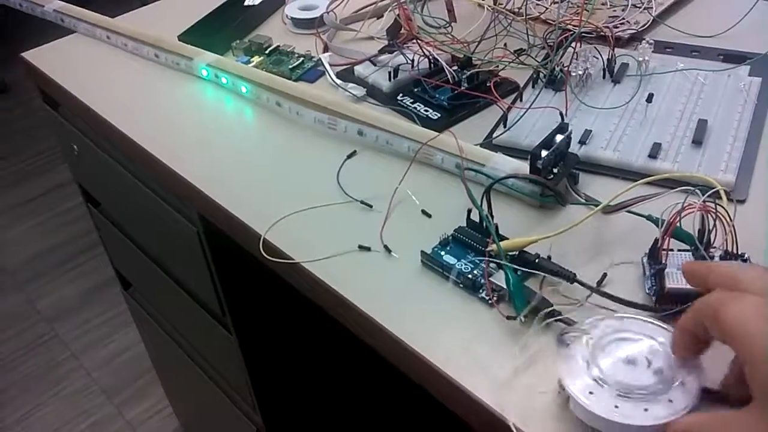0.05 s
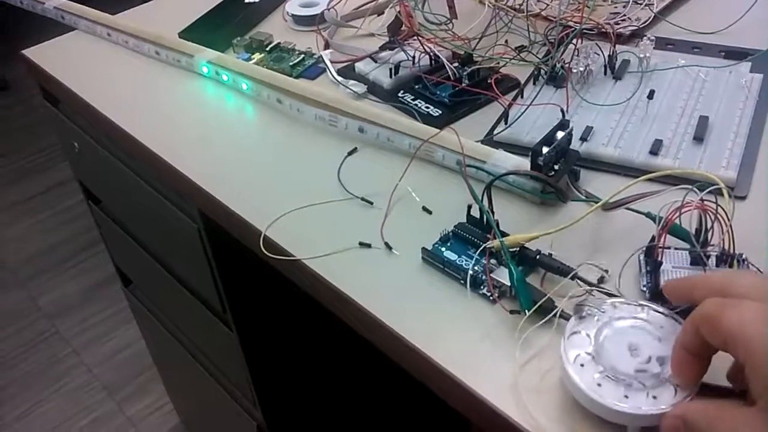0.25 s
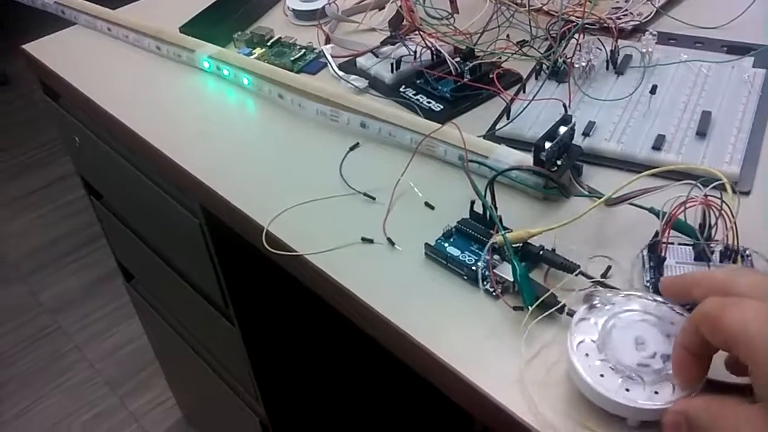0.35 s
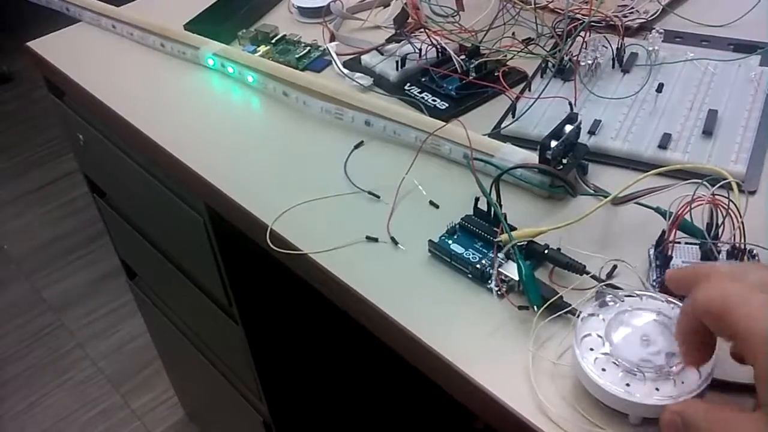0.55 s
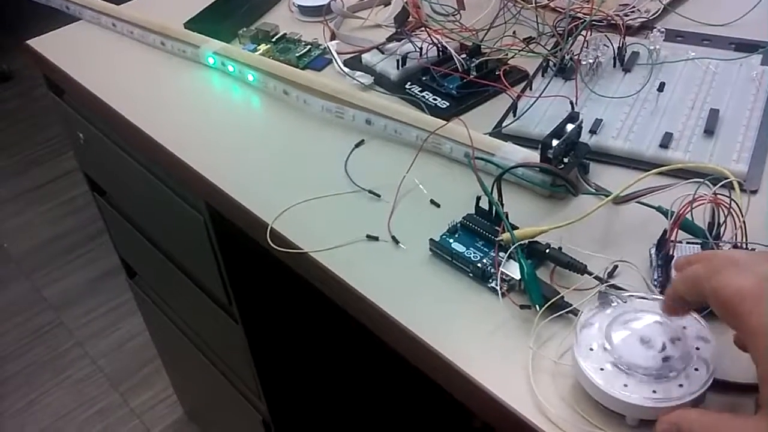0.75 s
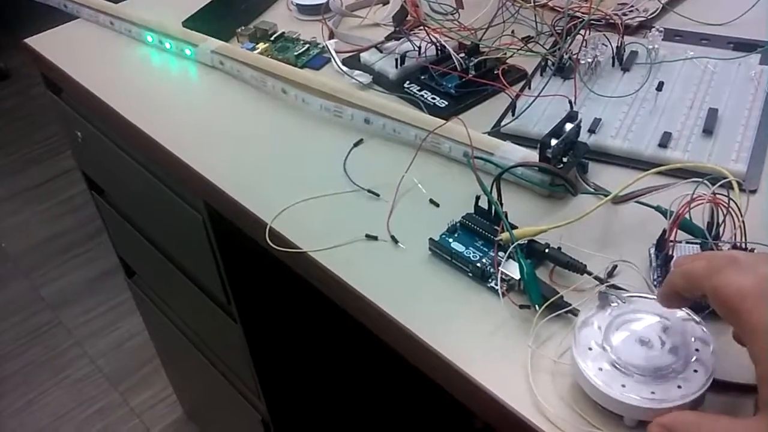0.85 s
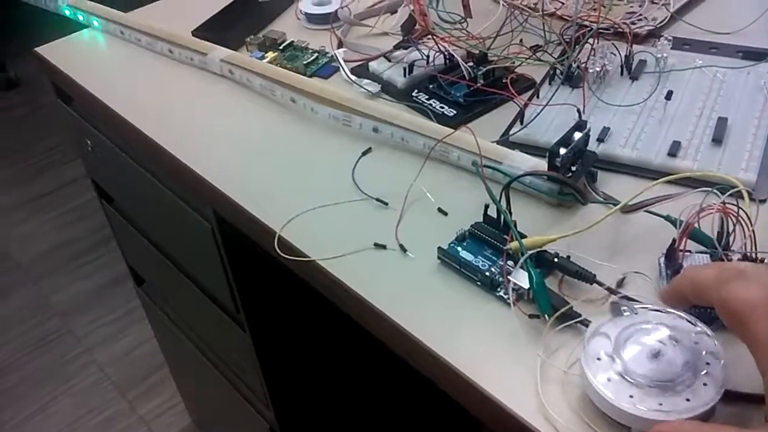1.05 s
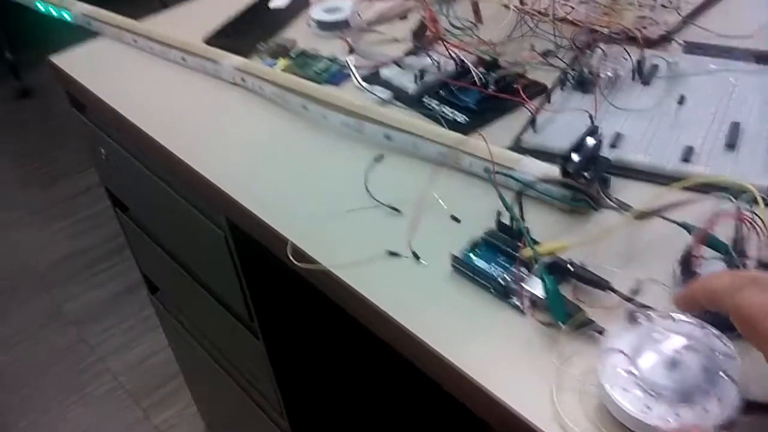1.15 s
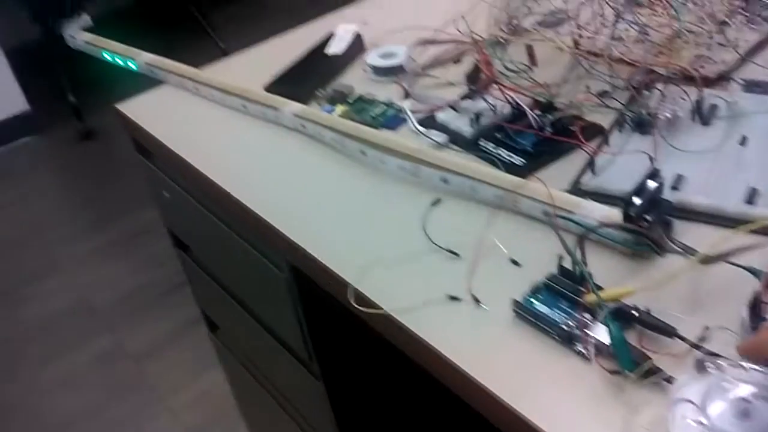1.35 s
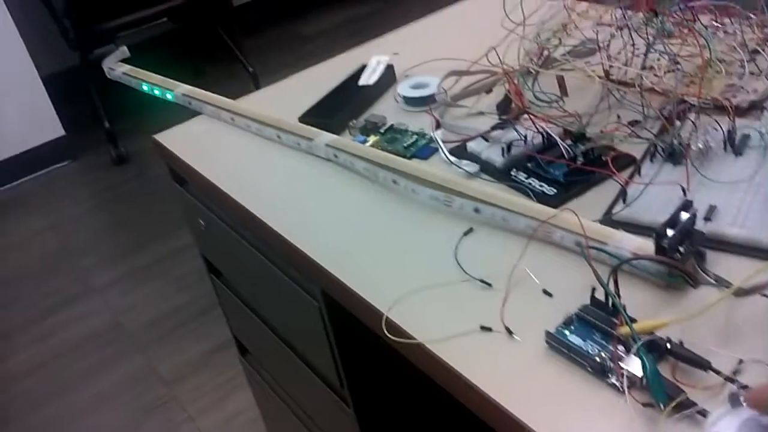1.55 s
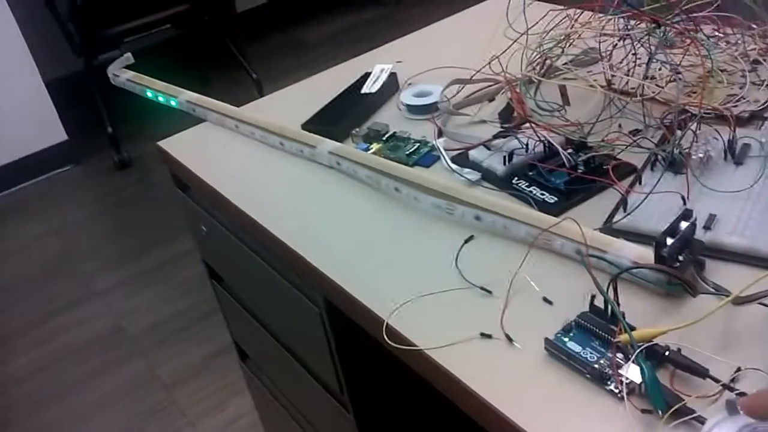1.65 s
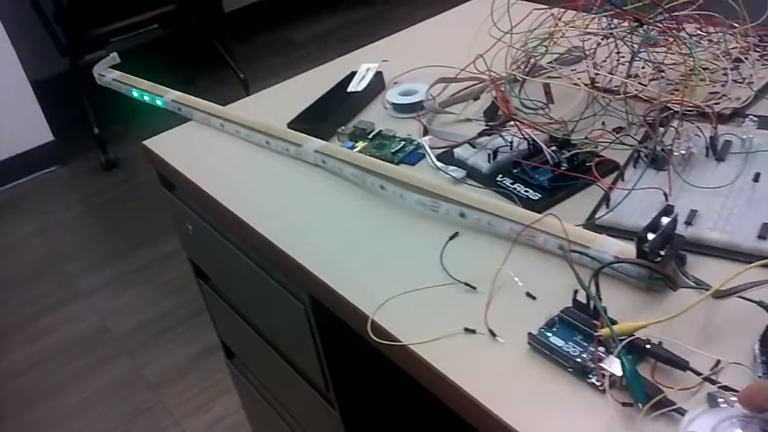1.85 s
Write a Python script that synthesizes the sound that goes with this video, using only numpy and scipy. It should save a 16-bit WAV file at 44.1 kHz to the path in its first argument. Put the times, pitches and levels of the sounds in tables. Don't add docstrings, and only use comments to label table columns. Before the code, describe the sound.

A rotary dial on a desk, heard close in a large live room. Light ticks and a gritty winding scrape lead to a hard plastic knock at 0.24 s, echoing long. Small ticks follow, then a softer release knock at 0.64 s. From 0.87 to 1.24 s the gears whir back, throbbing, ending in a click. Faint taps come near 1.75 s over low rumble and hiss.

```python
import sys
import numpy as np
from scipy import signal
from scipy.io import wavfile

SR = 44100
rng = np.random.default_rng(int(sys.argv[2]) if len(sys.argv) > 2 else 0)


def master_out(mix):
    frames = np.transpose(np.atleast_2d(mix))
    ceiling = np.clip(frames, -1, 1)
    pcm = np.round(ceiling * 32767).astype(np.int16)
    wavfile.write(sys.argv[1], SR, pcm)


def to_linear_factor(level_db):
    exponent = np.asarray(level_db, float) / 20
    return 10 ** exponent


N = 83790
BURST = 4800

# (pitch [Hz], level [dB], time to die by 60 dB [s])
DIAL_MODES = [(2830, -12.5, 0.00796), (3400, -6, 0.0098), (4190, -7, 0.022), (4885, -11.5, 0.02016),
              (5610, -10, 0.012), (6120, -5, 0.013), (6200, -22, 0.025), (6900, -7.5, 0.0058),
              (7150, -18, 0.0098), (7870, -10, 0.013), (8890, -11, 0.0066), (10370, -8, 0.0017),
              (13400, -9.5, 0.0023), (15250, -13, .006)]
# (pitch [Hz], level [dB], time to die by 60 dB [s])
DESK_MODES = [(461, 4, 0.047), (586, 3, 0.025), (710, 2, 0.036), (962, -3.5, 0.085), (1237, -10.5, 0.046),
              (1267, -5.5, 0.0142), (1595, -9, 0.051), (1888, -5, 0.036), (2177, -4, 0.023),
              (2520, -10, 0.017), (3400, -9, 0.0209)]
# (pitch [Hz], level [dB], time to die by 60 dB [s])
STOP_HIGH = [(2286, -4.5, 0.0075), (2936, -10.5, 0.0077), (3430, -9, 0.014), (3953, -4, 0.021),
             (4300, -9.5, 0.0047), (5280, -2, 0.0095), (6200, 0.5, 0.0083), (6900, 0.5, 0.011),
             (7820, -6, 0.0028), (8670, -19, .005), (12770, -26, 0.00405)]
# (pitch [Hz], level [dB], time to die by 60 dB [s])
STOP_LOW = [(166.5, -12, 0.17), (329, -15.5, 0.05), (462, -4.5, 0.07), (555.4, -2.5, 0.076),
            (788, -8, 0.06), (898.5, -4, 0.073), (1040, -1, 0.053), (1254, -9.5, 0.04), (1369, -11, .04),
            (1601, -3.5, 0.048), (1876, -8.5, 0.031), (2192, -9, 0.034)]


def rms_of(x):
    return np.sqrt(np.mean(x ** 2) + 1e-20)


def rms_one(x):
    return x / rms_of(x)


def in_time(rows):
    s, *columns = np.transpose(rows)
    return [np.interp(np.arange(N) / SR, s, c) for c in columns]


def at_hz(points, hz):
    return np.interp(np.log(hz), np.log(np.array(points)[:, 0]), np.array(points)[:, 1])


def drift(rate):
    step = 40
    r = np.exp(-2 * step * np.pi * rate / SR)
    white = rng.standard_normal(N // step + 2002)
    slow = signal.lfilter([1], [1, -2 * r, r * r], white)[2000:]
    return np.interp(np.arange(N) / step, np.arange(len(slow)), rms_one(slow))


def grains(size):
    contacts_per_s = 9000
    strengths = to_linear_factor(2.5 * np.minimum(rng.exponential(1, size), 4)) * rng.choice([-1, 1], size)
    return rms_one(strengths * (rng.random(size) < contacts_per_s / SR))


def ring(contacts, hz, t60):
    r = to_linear_factor(-60 / (max(t60, .002) * SR))
    w = 2 * np.pi * hz / SR
    band = [hz / 1.25, min(hz * 1.25, 20000)]
    near = signal.sosfilt(signal.butter(1, band, "band", fs=SR, output="sos"), contacts + 1e-18)
    rung = signal.lfilter([0, np.sin(w)], [1, -2 * r * np.cos(w), r * r], near)
    return np.sqrt(2 * (1 - r * r)) * rung


def add_rattle(out, modes, s, db, length, centre_hz=None, octaves=1, flatness=1.43):
    t = np.arange(BURST) / SR
    shape = np.minimum(t / .0008, 1) * np.exp(-(t / length) ** flatness)
    contacts = grains(BURST)
    i = int(s * SR)
    for k, (hz, mode_db, t60) in enumerate(modes):
        far_db = 0 if centre_hz is None else -6 * (np.log2(hz / centre_hz) / octaves) ** 2
        if far_db < -35:
            continue
        own_contacts = np.roll(contacts, k * 397)
        rung = rms_one(ring(own_contacts * shape, hz, t60)) * rms_of(shape)
        out[i:i + BURST] += (to_linear_factor(db + mode_db + far_db - 0.5) * rung)[:len(out) - i]


def add_swing(out, modes, s, db, length):
    rise_s = .0023
    t = np.arange(BURST) / SR
    i = int(s * SR)
    for k, (hz, mode_db, t60) in enumerate(modes):
        fade = (1 - np.exp(-t / rise_s)) * to_linear_factor(-60 * t / t60)
        swing = fade * np.sin(2 * np.pi * hz * t) * (-1) ** k
        out[i:i + BURST] += to_linear_factor(db + mode_db - 4.5) * rms_one(swing) * np.sqrt(length * SR / BURST)


def add_knock(out, high, low, s, db, length):
    low_lag_s, low_share = .0017, .84
    add_rattle(out, high, s, db, length, flatness=2.2)
    add_swing(out, low, s + low_lag_s, db, length * low_share)


def rub(modes, gate_db):
    contacts = grains(N)
    out = np.zeros(N)
    for k, (hz, db, t60) in enumerate(modes):
        own_contacts = np.roll(contacts, k * 997)
        out += to_linear_factor(db) * ring(own_contacts * to_linear_factor(gate_db), hz, t60)
    return out


def rubbed_dial():
    centre_hz, octaves, damping = 6500, .57, .64
    return [(hz, db - 6 * (np.log2(hz / centre_hz) / octaves) ** 2, t60 * damping)
            for hz, db, t60 in DIAL_MODES]


def catches(rows):
    fade_s = .0019
    t = np.arange(N) / SR
    return sum(db * (t > s) * np.exp(-((t - s) / fade_s) ** 2) for s, db in rows)


def bands(noise):
    edges = 22 * 2 ** np.arange(0, 9.7, 1 / 3)
    for k, (low, high) in enumerate(zip(edges, edges[1:])):
        band_filter = signal.butter(2, [low, high], "band", fs=SR, output="sos")
        yield np.sqrt(low * high), signal.sosfilt(band_filter, noise[k % 2])


def steady(spectrum, patchy_db):
    out = np.zeros(N)
    for hz, band in bands(rng.standard_normal((2, N + SR))):
        if spectrum[0][0] < hz < spectrum[-1][0]:
            out += band[SR:] * to_linear_factor(at_hz(spectrum, hz) + patchy_db * drift(3.5))
    return rms_one(out)


def hard_knocks():
    # (pitch [Hz], level [dB], time to die by 60 dB [s])
    release_high = [(3470, -6, 0.0046), (4500, -11.5, 0.0017), (6260, 0, 0.015), (6900, 3, 0.0064),
                    (7870, -4, 0.0093), (9800, -24, 0.0033), (14000, -24, .003)]
    # (pitch [Hz], level [dB], time to die by 60 dB [s])
    release_low = [(159, 2.5, 0.077), (329, -7, .04), (443, -2, 0.037), (536, 1.5, 0.054),
                   (677, -1.5, 0.034), (1023, 0, 0.038), (1174, 4, 0.045), (1324, 5.5, 0.023),
                   (1690, 1, 0.033), (1838, 4.5, 0.054), (2060, -10, .02), (2407, -2.5, 0.012)]
    out = np.zeros(N)
    add_knock(out, STOP_HIGH, STOP_LOW, s=.2378, db=-24, length=.0098)
    add_knock(out, release_high, release_low, s=.6385, db=-35, length=.0061)
    return out


def gear_return():
    # (time [s], level [dB])
    whir = [
        (.87, -48.5),
        (.895, -57),
        (.92, -44.5),
        (1.0, -45.5),
        (1.1, -45.5),
        (1.2, -47),
        (1.236, -45),
        (1.245, -73),
    ]
    # (time [s], level above the rustle [dB])
    hard_teeth = [(.9575, 3.4), (.9792, 4.3), (.9836, 3.8), (.992, 2.4), (1.004, 5), (1.0081, 7.9),
                  (1.018, 3.1), (1.029, 5.7), (1.035, 2.3), (1.0495, 11), (1.0555, 5.2), (1.0789, 6.3),
                  (1.0844, 4.8), (1.092, 4.6), (1.1035, 4), (1.108, 5.2), (1.1285, 5.3), (1.1328, 3.8),
                  (1.14, 3.5), (1.1548, 5.7), (1.167, 4.8), (1.1772, 7.7), (1.185, 3.7), (1.1977, 9),
                  (1.2045, 7.5), (1.215, 8.7), (1.2326, 3.5)]
    cam_turn_s, gap_at_s, gap_s = .0494, 1.1232, .0036
    gap_db, half_gap_db = -16, -7
    teeth_per_s, tooth_db, tooth_jitter = 160, 3, .08
    start_s, end_s = .865, 1.25
    t = np.arange(N) / SR
    since_gap = t - gap_at_s

    def gap(turn_share):
        away_s = (np.mod(since_gap / cam_turn_s + turn_share + .5, 1) - .5) * cam_turn_s
        return np.exp(-.5 * (away_s / gap_s) ** 2)

    silent_db = 80 * ((t < start_s) | (t > end_s))
    teeth = np.mod(since_gap * teeth_per_s + tooth_jitter * drift(32), 1)
    gate_db = gap_db * gap(0) + half_gap_db * gap(.5) + tooth_db * (teeth < .2)
    gate_db = gate_db + 1.5 * drift(80) + catches(hard_teeth)
    return rub(rubbed_dial(), gate_db + in_time(whir)[0] - 8 - silent_db)


def winding():
    # (time [s], dial level [dB], desk level [dB])
    scrape = [
        (0, -56.5, -54.5),
        (.085, -53, -59),
        (.135, -50.5, -58.5),
        (.140, -40, -52),
        (.165, -43.5, -49),
        (.19, -40.5, -43),
        (.21, -36.5, -53.5),
        (.236, -48, -39),
        (.26, -55.5, -55),
        (.30, -99, -99),
    ]
    # (time [s], level above the rustle [dB])
    hard_teeth = [(.1438, 4.5), (.1515, 3.5), (.1657, 9), (.1735, 4), (.1862, 3), (.195, 2), (.2037, 8.5),
                  (.212, 2.5), (.2225, 6), (.231, 1.5)]
    # (pitch [Hz], level [dB], time to die by 60 dB [s])
    housing = [(2210, -17.5, .006), (3050, -13, .004), (3750, -8, 0.0024), (4870, -8, .008)]
    dial_db, desk_db = in_time(scrape)
    clumps_db = 1.5 * drift(90) - 6.5
    dial = rub(rubbed_dial() + housing, dial_db + clumps_db + catches(hard_teeth))
    return dial + rub(DESK_MODES, desk_db + clumps_db)


def ticks():
    # (time [s], level [dB], rattle length [s], centre of the ringing tones [Hz], spread [octaves])
    tick_rows = [(.000, -32, 0.0015, 6500, 0.49), (0.085, -45, 0.01, 4500, 0.31),
                 (.1082, -38.5, 0.0016, 5860, 0.14), (.1878, -31.5, .003, 5740, 0.28),
                 (.2375, -21, .002, 6400, .5), (.2752, -31, 0.00412, 14800, .13),
                 (0.283, -33.5, 0.0026, 7040, 0.54), (0.3366, -29.5, 0.0063, 7200, 0.21),
                 (0.355, -39, 0.0027, 7240, 0.24), (0.568, -47, 0.0028, 6500, 0.43),
                 (0.741, -46, 0.0016, 9200, 0.43), (0.799, -36.5, 0.0029, 5540, 0.38),
                 (0.8028, -41.5, 0.0047, 5900, 0.54), (0.812, -44.5, 0.0094, 5470, 0.26),
                 (0.815, -49.5, 0.005, 3300, 0.15), (0.841, -53, 0.015, 6000, 0.77),
                 (0.857, -50, 0.004, 6000, 0.54), (0.864, -35, 0.0028, 3960, 0.64),
                 (0.899, -49, 0.0063, 6000, 0.56), (0.9048, -42.5, 0.01, 5450, 0.77),
                 (0.934, -47.5, 0.0085, 6200, 0.68), (1.231, -53, 0.011, 3400, .1),
                 (1.2542, -37.5, 0.0022, 6330, 0.27), (1.2545, -32, 0.0034, 14850, 0.14),
                 (1.449, -55, 0.013, 6900, 0.22), (1.475, -64.5, 0.0092, 6500, 0.41),
                 (1.740, -54, 0.0029, 6500, 0.25)]
    out = np.zeros(N)
    for row in tick_rows:
        add_rattle(out, DIAL_MODES, *row)
    return out


def thuds():
    # (time [s], level [dB], length [s], centre of the ringing tones [Hz], spread [octaves])
    thud_rows = [
        (0.0658, -37, 0.0019, 802, 1),
        (0.137, -37.5, 0.0035, 1500, 1.03),
        (0.789, -47.5, 0.0071, 710, 0.22),
        (0.862, -45.5, 0.002, 2300, 0.36),
        (1.228, -56.5, 0.018, 1060, 1.2),
        (1.322, -62, 0.026, 950, 0.22),
        (1.7424, -52, 0.012, 1370, 0.78),
        (1.768, -58, 0.013, 870, 0.95),
        (1.808, -57, 0.008, 1250, 0.37),
    ]
    out = np.zeros(N)
    for row in thud_rows:
        add_rattle(out, DESK_MODES, *row)
    return out


def room(x):
    # (pitch [Hz], time to die by 60 dB [s])
    echo_t60 = [(150, 1), (500, 1.046), (1500, 1.056), (4000, 0.62), (8000, 0.33), (15000, 0.055)]
    echo_db, build_s = -15.5, .00555
    earlier_s, earlier_db = .22, -27.5
    scatter_hz, scatter_db = 42, 0
    t = np.arange(N) / SR
    tails = np.zeros((3, N))
    for hz, band in bands(rng.standard_normal((2, 3, N))):
        tails += band * to_linear_factor(-60 * t / at_hz(echo_t60, hz))
    tails = tails * (1 - np.exp(-(t / build_s) ** 2))
    before = np.zeros(int(earlier_s * SR))
    add_rattle(before, STOP_LOW + STOP_HIGH, 0, earlier_db, .01)
    heard = np.r_[before, x]
    turn = 2 * np.pi * scatter_hz * np.arange(len(heard)) / SR
    blur = to_linear_factor(scatter_db)
    copies = heard * np.array([np.ones(len(heard)), blur * np.cos(turn), blur * np.sin(turn)])
    tails = tails / np.sqrt(np.sum(tails[0] ** 2))
    wet = signal.fftconvolve(copies, tails, axes=1).sum(axis=0)
    return to_linear_factor(echo_db) * wet[len(before):len(before) + N]


def ventilation_rumble():
    # (pitch [Hz], level [dB])
    rumble_colour = [(15, -71), (25, -25), (152, -4), (189, 5), (325, 4.5), (604, -12), (920, -13.5),
                     (1320, -27), (3000, -36), (3900, -79), (6600, -120)]
    # (time [s], level [dB])
    swell = [(0, 5.5), (.5, -4), (.9, -1), (1.2, -1.5), (1.45, -4), (1.9, 0)]
    level_db = -53.5 + in_time(swell)[0]
    return to_linear_factor(level_db) * steady(rumble_colour, patchy_db=3)


def microphone_hiss():
    # (pitch [Hz], level [dB])
    hiss_colour = [(1500, -5.5), (2500, -9), (4000, -10), (6000, -5), (9000, -4.5), (13000, -3.5),
                   (16500, 2)]
    return to_linear_factor(-66.5) * steady(hiss_colour, patchy_db=0)


def scene():
    dial = hard_knocks() + ticks() + thuds() + winding() + gear_return()
    low_cut = signal.butter(3, 120.2, "high", fs=SR, output="sos")
    picked_up = signal.sosfilt(low_cut, dial + room(dial))
    return (picked_up + ventilation_rumble() + microphone_hiss())[None]


def band_limit(x):
    return signal.sosfilt(signal.butter(12, 16480, fs=SR, output="sos"), x)


def record(dry):
    ceiling, cutoff_hz = .42, 15900
    rounded = ceiling * np.tanh(dry / ceiling)
    top_cut = signal.cheby2(10, 50, cutoff_hz * 1.04, fs=SR, output="sos")
    mix = signal.sosfilt(top_cut, rounded)
    return band_limit(mix)


dry = scene()
out = record(dry)
master_out(out)
```